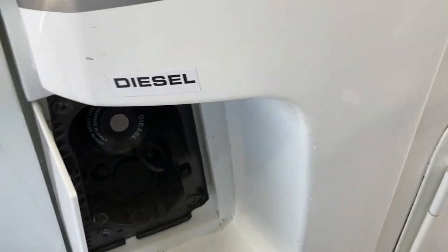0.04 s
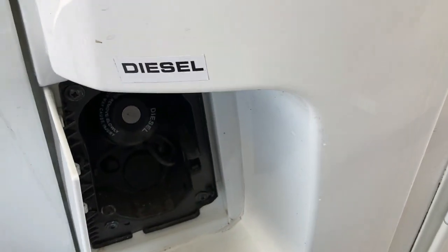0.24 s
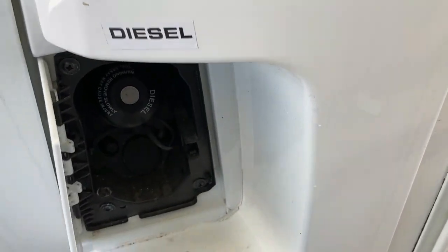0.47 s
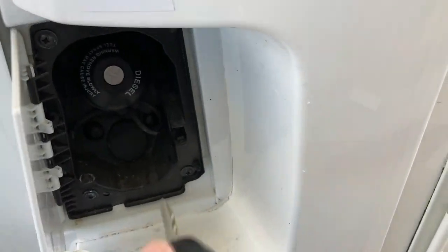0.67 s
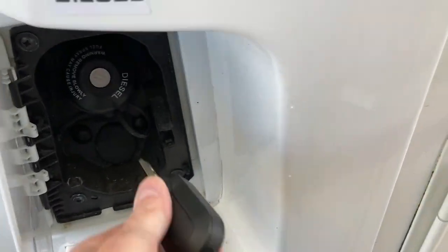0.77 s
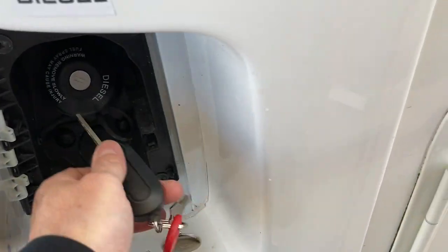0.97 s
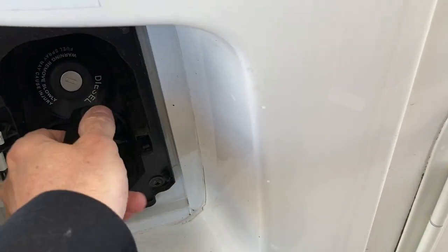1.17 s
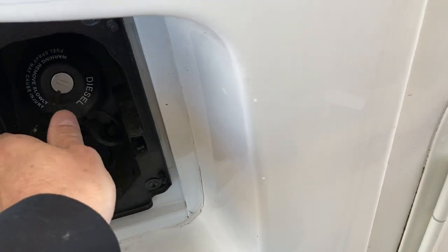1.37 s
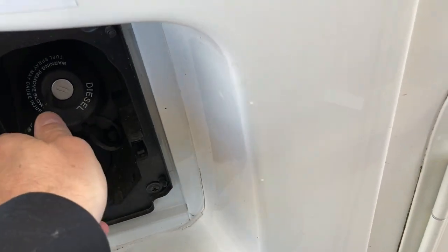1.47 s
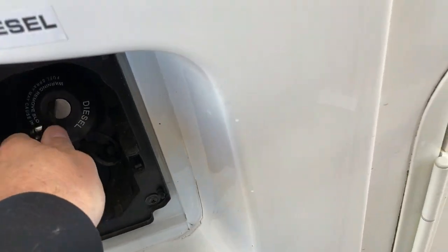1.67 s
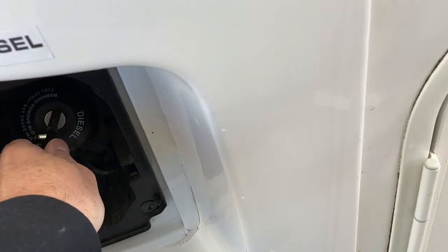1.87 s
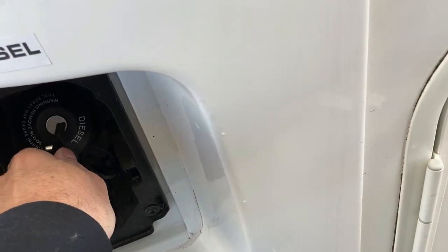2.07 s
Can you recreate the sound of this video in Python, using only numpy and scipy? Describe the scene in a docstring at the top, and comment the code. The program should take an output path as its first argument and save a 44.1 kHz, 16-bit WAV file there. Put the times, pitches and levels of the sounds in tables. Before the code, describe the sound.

Keys jingle in a hand, a door thuds nearby, then a key knocks a hollow plastic fuel cap

```python
"""Keys at a filler cap

A bunch of keys jingles in a hand beside a van while a door shuts further off: dying sines and bright clicks
for the keys, soft booms and low noise for the door. Then a key taps and scrapes at a locking plastic
filler cap, and the hollow recess around it rings at each touch. Traffic, made of filtered noise, rumbles
outdoors. A close pair of microphone ports hears it all, one slightly ahead of the other at most pitches."""
import sys
import numpy as np
from scipy import signal
from scipy.fft import rfft, irfft
from scipy.io import wavfile

SR = 44100
rng = np.random.default_rng(int(sys.argv[2]) if len(sys.argv) > 2 else 0)


def master(y):
    """Save y as 16-bit WAV."""
    cut = np.clip(np.atleast_2d(y).T, -1, 1)
    pcm = np.round(cut * 32767)  # scale
    wavfile.write(sys.argv[1], SR, pcm.astype(np.int16))


N = 92610
T = np.arange(N) / SR   # time in seconds
HZ = np.arange(N // 2 + 1) * SR / N + 1e-3   # every frequency of the spectrum, kept above zero for the logs

# The tone colour of metal touching metal. Each row: frequency in Hz, relative level in dB.
CLICK_COLOUR = [(1400, -13), (2300, -9), (5000, 6), (12000, 8), (15000, -3), (16500, -36)]
# The pitches of the hollow around the cap. Each row: frequency in Hz, level in dB,
# time to fall by 60 dB in seconds.
RECESS_MODES = [(1490, 0.5, 0.017), (2180, -12, 0.0052), (3980, -25, 0.0097)]


def keys():
    """Strikes click, knock the plastic fob and set keys ringing until a touch stops them; keys also chatter."""
    # When keys strike. Each row: time in seconds, click level in dB, fob level in dB.
    jingles = [(0.0666, -45.5, -61), (0.0957, -43.5, -51), (0.1664, -22, -32), (0.396, -35, -53),
               (0.422, -54, -45), (0.435, -31, -48), (0.4408, -30.5, -53), (0.462, -64, -45),
               (0.4668, -29, -54), (0.487, -27, -38.5), (0.5218, -23.5, -46), (0.5553, -33.5, -49.5),
               (0.6139, -39, -75), (0.6922, -28.5, -69), (0.7186, -29.5, -53), (0.9116, -46, -62),
               (0.968, -44, -79), (1.0147, -40.5, -54), (1.052, -34.5, -54.5), (1.1135, -31.5, -50.5),
               (1.1577, -33.5, -50), (1.1738, -33, -54), (1.1927, -49, -53), (1.2063, -28.5, -44.5),
               (1.2465, -38, -48.5)]
    # Strikes that leave keys ringing. Each row: time in seconds, levels in dB of the long-ringing key's lower
    # pair of pitches, its higher pair, the short-ringing key and the low key, then seconds of free ringing
    # before a touch.
    ringing_strikes = [(.168, -28, -13.5, -16, -37, 0.25), (0.183, -21.5, -52, -13.5, -22, 0.047),
                       (.441, -44, -48, -6.5, -78, 0.0033), (0.458, -59, -59, -29, -79, 0.0074),
                       (0.524, -31, -35, -42, -54, 0.014), (0.964, -32, -57, -47, -75, 0.0066),
                       (1.014, -51, -51, -33.5, -58.5, 0.035), (1.112, -29, -27, -29, -50, 0.033),
                       (1.192, -33, -25, -34, -42, 0.014), (1.204, -54, -40, -21, -64, 0.042)]
    # The pitches of the long-ringing key, in two lists: its lower pair and its higher pair, each with its own
    # level. Each row: frequency in Hz, level in dB, time to fall by 60 dB in seconds, beat rate in Hz, beat
    # phase in radians.
    long_key_pairs = [(10518, 0, .45, 7.7, .2), (11285, 1, .25, 5.0, .8)], [(14387, -5, .6, 7.0, -.9),
                      (15115, -14, .6, 6.0, 1.2)]
    # The pitches of the short-ringing key. Each row: frequency in Hz, level in dB,
    # time to fall by 60 dB in seconds.
    short_key = [(14245, 0, .09), (13520, -18, .06)]
    low_key, fob = [(4548, 0.011, 0.15)], [(2207, 7.3, 0.029)]   # the same three columns
    # Spells of chatter. Each row: start, top and end in seconds, relative level in dB.
    chatter_spells = [(.05, .15, 0.2, -54.5), (.168, .175, 0.29, -37), (.675, .7, 0.76, -53),
                      (.885, .91, 0.96, -46.5), (1.02, 1.2, 1.25, -45.5)]
    chatter_per_s, chatter_ring_db, chatter_t60_s = 2200, -5.5, 0.019
    ring_rise_s, choke_s = 0.00067, 0.009
    fob_spread = 0.07   # each knock shifts the fob's pitch by about this share
    waver_db, waver_per_s = 3.1, 60   # every pitch wavers as the keys swing

    out = clicks([(start, click_db) for start, click_db, _ in jingles])
    t = T[:SR // 3]
    for start, _, fob_db in jingles:
        pitch_shift = 1 + fob_spread * rng.standard_normal()
        add(out, start, amp(fob_db) * struck(fob, t * pitch_shift))

    ticks = grains(chatter_per_s)
    chatter = rms_one(shaped(ticks, amp(at_hz(CLICK_COLOUR))))
    for k, key in enumerate([*long_key_pairs, short_key, low_key]):
        for mode in key:
            voice = np.zeros(N)
            for start, *key_db, free_s in ringing_strikes:
                rise = np.minimum(t / ring_rise_s, 1)
                choke = np.exp(-np.maximum(t - free_s, 0) / choke_s)
                add(voice, start, amp(key_db[k]) * rise * choke * struck([mode], t))
            out += amp(waver_db * drift(waver_per_s)) * voice
            # Each chatter tick also stirs this pitch.
            chatter += amp(chatter_ring_db) * rms_one(ring(ticks, mode[0], chatter_t60_s))
    return out + strokes(chatter_spells, level_column=3) * chatter


def taps():
    """Each touch of key on cap swells and dies in the recess in a few cycles, with a click and a panel thump."""
    # When the key meets the cap. Each row: time in seconds, then levels in dB before panning
    # of the recess tone's peak, the click and the panel thump.
    touches = [(1.3114, -10.5, -40.5, -35.5), (1.4241, -41, -64, -55), (1.508, -17, -49.5, -42),
               (1.6355, -18.5, -28, -43), (1.6415, -29, -70, -54), (1.7345, -22.5, -52, -63),
               (1.7414, -25.5, -75, -70), (1.795, -39, -65, -50.5), (1.8035, -60, -79, -46),
               (1.8484, -43, -74, -50.5), (1.8596, -45, -75, -65), (1.879, -47, -66, -41),
               (1.8924, -45, -63, -44.5), (1.9015, -36.5, -48, -37.5), (2.0934, -45.5, -55, -50)]
    # The tone colour of the panel thump. Each row: frequency in Hz, relative level in dB.
    panel_colour = [(280, 0.5), (600, 5), (1000, -11.5), (2700, -6.5), (3500, -38)]
    rise_s = 0.0018
    recess_hz = RECESS_MODES[0][0]   # only the main pitch of the recess

    out = clicks([(start, click_db) for start, _, click_db, _ in touches])
    t = T[:SR // 10]
    swell = (t / rise_s * np.exp(1 - t / rise_s)) ** 2   # reaches 1 at rise_s
    for start, peak_db, _, _ in touches:
        add(out, start, amp(peak_db) * swell * np.sin(2 * np.pi * recess_hz * t))
    thumps = [(start, thump_db) for start, _, _, thump_db in touches]
    return out + bursts(thumps, panel_colour, t60=0.046, tail_t60=0.11, tail_db=-10.5)


def rubbing():
    """The key rubs the cap: dense tiny grains ring the recess, and a dry hiss goes with them."""
    # Strokes of the key. Each row: start, top and end in seconds, then relative levels in dB
    # of the recess ring and the dry hiss.
    rubs = [(1.315, 1.32, 1.45, -43.5, -59), (1.51, 1.515, 1.64, -51.5, -61.5),
            (1.64, 1.645, 1.84, -46, -62), (1.683, 1.695, 1.865, -41.5, -58.5),
            (1.71, 1.734, 1.755, -34, -52), (1.84, 1.93, 2.26, -55.5, -82)]
    ticks = grains(per_s=1200)
    hollow = np.zeros(N)
    for hz, db, t60 in RECESS_MODES:
        # Ringing twice at the same pitch makes each grain swell before it dies.
        once = ring(ticks, hz, t60)
        hollow += amp(db) * rms_one(ring(once, hz, t60 / 2))
    rough_noise = rng.standard_normal(N) * amp(4.7 * drift(90))
    hiss = rms_one(shaped(rough_noise, amp(at_hz(CLICK_COLOUR))))
    return strokes(rubs, level_column=3) * hollow + strokes(rubs, level_column=4) * hiss


def door():
    """The door panel booms as it meets the seal, the latch rings body pitches, and a shudder dies away."""
    # The soft booms. Each row: top in seconds, level in dB, frequency in Hz,
    # rise and fall widths in seconds.
    booms = [(.2345, -11.5, 130, .007, .015), (.2915, -10, 143, .016, .004)]
    # Body pitches set off by the latch. Each row: frequency in Hz, level in dB,
    # time to fall by 60 dB in seconds.
    body_modes = [(547, -23.5, .2), (78.6, -24, 0.59), (136.1, -23, 0.69), (206, -23.5, 0.22)]
    # The tone colour of the shudder. Each row: frequency in Hz, relative level in dB.
    shudder_colour = [(24, -62.5), (40, -41.5), (130, -2), (269, -18.5), (529, -25), (4000, -62)]
    latch_s, latch_soft_hz = 0.285, 18.4   # a lower latch_soft_hz gives a slower onset
    shudder_start_s, shudder_rise_s, shudder_db, shudder_t60_s = 0.2185, 0.068, -19, 0.65

    out = np.zeros(N)
    for top, db, hz, rise, fall in booms:
        from_top = T - top
        width = np.where(from_top < 0, rise, fall)
        bell = np.exp(-(from_top / width) ** 2 / 2)
        out += amp(db) * bell * np.cos(2 * np.pi * hz * from_top)
    soft_onset = 1 - np.exp(-2 * np.pi * latch_soft_hz * T)
    add(out, latch_s, soft_onset * struck(body_modes, T))

    t = np.maximum(T - shudder_start_s, 0)
    envelope = np.minimum(t / shudder_rise_s, 1) * amp(shudder_db - 60 * t / shudder_t60_s)
    return out + envelope * rms_one(shaped(rng.standard_normal(N), amp(at_hz(shudder_colour))))


def street():
    """Traffic rumble and hiss from noise, partly its own at each port; the bass throbs, the treble ebbs."""
    # The tone colour of the street. Each row: frequency in Hz, relative level in dB.
    street_colour = [(25, -15), (121, 1.5), (496, -21), (1470, -27.5), (4990, -34), (10400, -38.5),
                     (11900, -43), (14800, -38), (16500, -58)]
    # How the treble ebbs. Each row: time in seconds, relative level in dB.
    treble_ebb = [(0.0, -47), (0.37, -49.5), (2.1, -65)]
    # How alike the two ports are. Each row: frequency in Hz, share of the power common to both (0 to 1).
    likeness = [(300, 1), (500, 1), (1200, 0.62), (3500, 0.033), (7000, 0.16), (16000, 1)]
    level_db, treble_from_hz = -44.5, 1100
    hum_hz, hum_width_hz, hum_db = 233.4, 8, 12.5   # a wavering hum stands out of the rumble
    throb_db, throb_per_s = 0.54, 8.14

    white = rng.standard_normal((3, N))   # one noise for both ports, then one for each
    alike = np.clip(at_hz(likeness), 0, 1)
    mixed = np.sqrt(alike) * rfft(white[0]) + np.sqrt(1 - alike) * rfft(white[1:])
    hum = hum_db * np.exp(-((HZ - hum_hz) / hum_width_hz) ** 2)
    pair = rms_one(irfft(amp(at_hz(street_colour) + hum) * mixed, N))

    treble_share = 1 / (1 + (treble_from_hz / HZ) ** 2)
    bass = amp(throb_db * drift(throb_per_s)) * shaped(pair, 1 - treble_share)
    ebb_db = np.interp(T, *np.transpose(treble_ebb))
    treble = amp(ebb_db - ebb_db.mean()) * shaped(pair, treble_share)
    return amp(level_db) * (bass + treble)


def clicks(rows):
    """Bright contacts of metal, as short bursts of noise; each row: time in seconds, level in dB."""
    return bursts(rows, CLICK_COLOUR, t60=0.011, tail_t60=0.041, tail_db=-5.5)


def bursts(rows, colour, t60, tail_t60, tail_db):
    """A contact is a sharp crack, then a puff of noise of the same colour with a fainter tail."""
    rise_s, crack_db = 0.0015, 7   # the crack's level is relative to the puff
    envelope, cracks = np.zeros(N), np.zeros(N)
    t = T[:SR // 5]
    gain = amp(at_hz(colour))
    for start, db in rows:
        puff = amp(db - 60 * t / t60)
        tail = amp(db + tail_db - 60 * t / tail_t60)
        add(envelope, start, np.minimum(t / rise_s, 1) * (puff + tail))
        cracks[int(start * SR)] = amp(db + crack_db)
    noise = rms_one(shaped(rng.standard_normal(N), gain))
    return envelope * noise + shaped(cracks, gain / gain.mean())


def grains(per_s):
    """Rough contact is many random uneven ticks, whose strength swells and sinks by chance."""
    hits = rng.random(N) < per_s / SR
    return hits * rng.standard_normal(N) * amp(3.5 * drift(60))


def strokes(rows, level_column):
    """A loudness curve: each stroke swells to its top and fades."""
    return sum(amp(row[level_column]) * np.interp(T, row[:3], [0, 1, 0]) ** 2 for row in rows)


def struck(modes, t):
    """The dying sines of one blow; a split mode is two close pitches, heard as a beat."""
    out = np.zeros(len(t))
    for hz, db, t60, *beat in modes:
        swing = np.sin(np.pi * beat[0] * t + beat[1]) if beat else 1
        out += amp(db - 60 * t / t60) * np.sin(2 * np.pi * hz * t) * swing
    return out


def ring(x, hz, t60):
    """A resonator: a unit click sets a sine of about height 1 ringing, 60 dB down after t60 seconds."""
    r, w = amp(-60 / (t60 * SR)), 2 * np.pi * hz / SR
    # The tiny offset keeps the filter away from vanishingly small numbers.
    return signal.lfilter([0, np.sin(w)], [1, -2 * r * np.cos(w), r * r], x + 1e-18)


def drift(rate):
    """A slow chance wander: random values of spread 1, rate of them a second, joined by straight lines."""
    knots = rng.standard_normal(200)
    return np.interp(T * rate, np.arange(200), knots)


def add(out, start, sound):
    """Mix a sound in at a time in seconds."""
    i = int(start * SR)
    out[i:i + len(sound)] += sound[:N - i]


def amp(db):
    """Turn decibels into gain."""
    return 10 ** (np.asarray(db) / 20)


def rms_one(x):
    """Scale to an rms (average strength) of 1."""
    return x / np.sqrt(np.mean(x ** 2) + 1e-20)


def at_hz(points):
    """Read a table at every frequency, along a logarithmic pitch scale."""
    hz, value = np.transpose(points)
    return np.interp(np.log(HZ), np.log(hz), value)


def shaped(x, gain):
    """Filter by a gain for each frequency."""
    return irfft(rfft(x) * gain, N)


def scene():
    """Keys, door and street, with the cap a little to the right."""
    cap_pan_db = -1.1   # left port; the right port gets the opposite
    cap = amp([[cap_pan_db], [-cap_pan_db]]) * (taps() + rubbing())
    return keys() + cap + door() + street()


def record(dry):
    """The ports differ by a phase that changes with pitch, and the top is cut."""
    # How far the left port leads. Each row: frequency in Hz, lead in radians (negative: it lags).
    left_lead = [(300, 0), (500, -.4), (1500, -1.1), (2500, -1.3), (4500, 1.2), (5600, 3.1), (8500, 6.3),
                 (11290, 9), (14250, 11.9), (17000, 14.3)]
    # Half the lead moves the left port ahead, half holds the right port back.
    ports = shaped(dry, np.exp(0.5j * at_hz(left_lead) * [[1], [-1]]))
    # From 16800 Hz up, all is at least 60 dB down.
    top_cut = signal.cheby2(12, 60, 16800, fs=SR, output="sos")
    return signal.sosfilt(top_cut, ports)


dry = scene()
out = record(dry)
master(out)
```